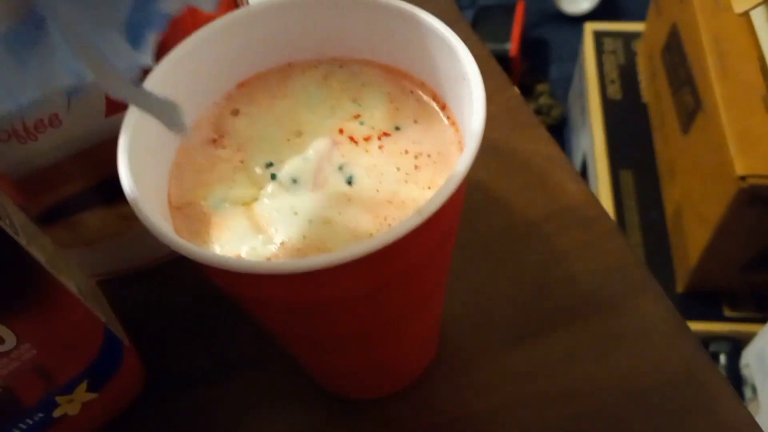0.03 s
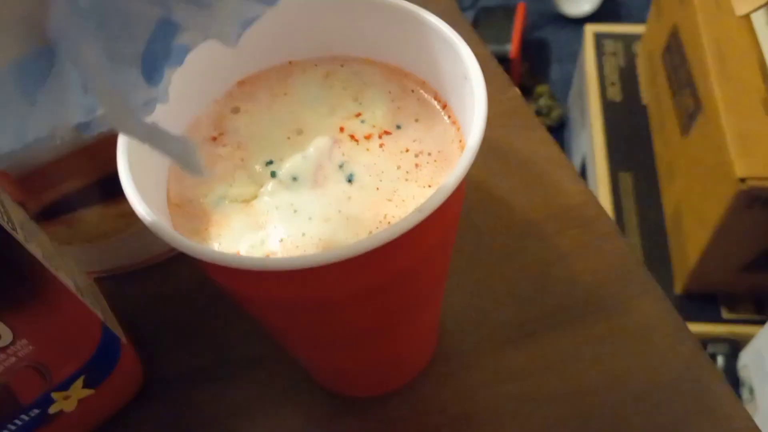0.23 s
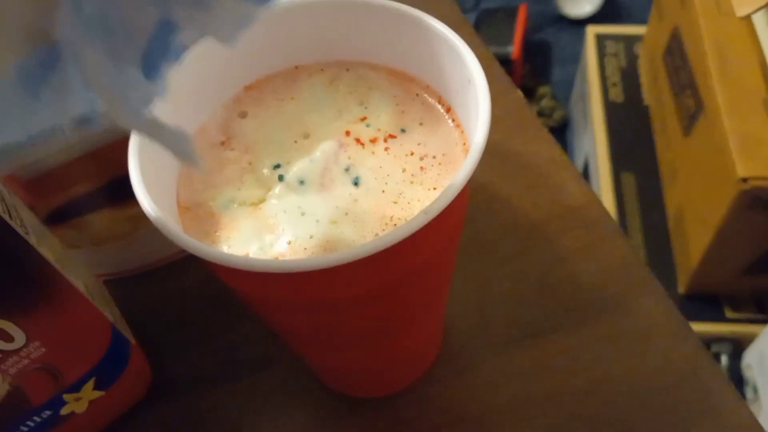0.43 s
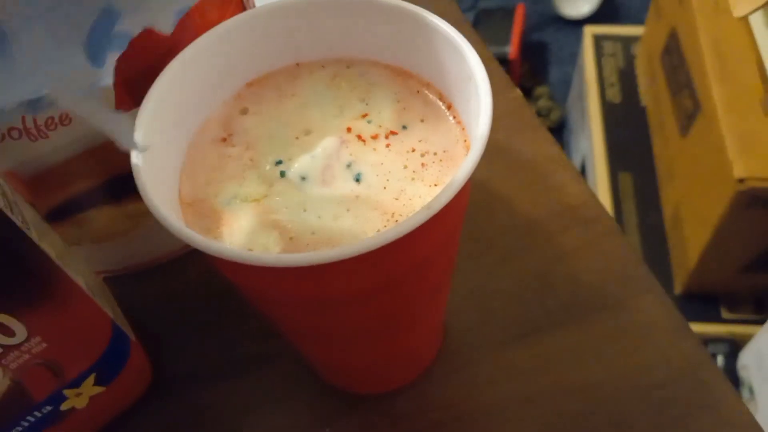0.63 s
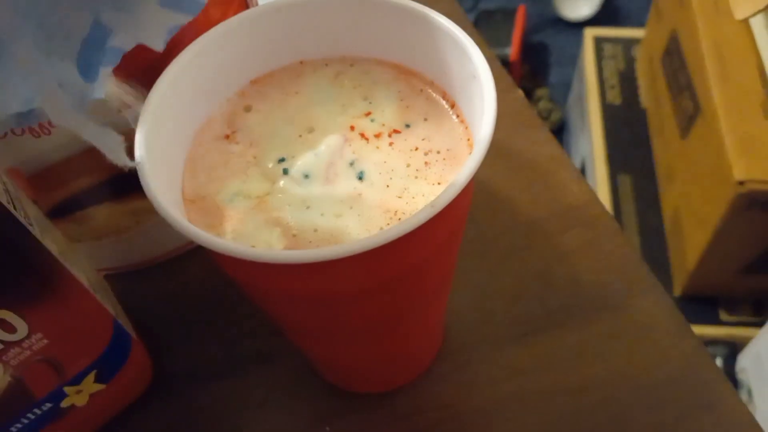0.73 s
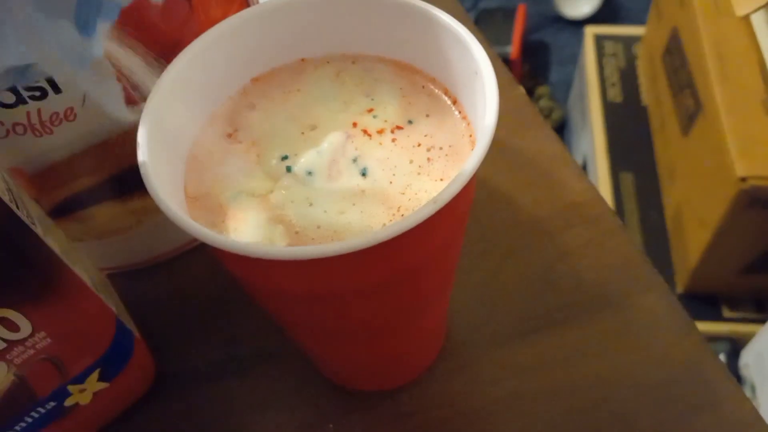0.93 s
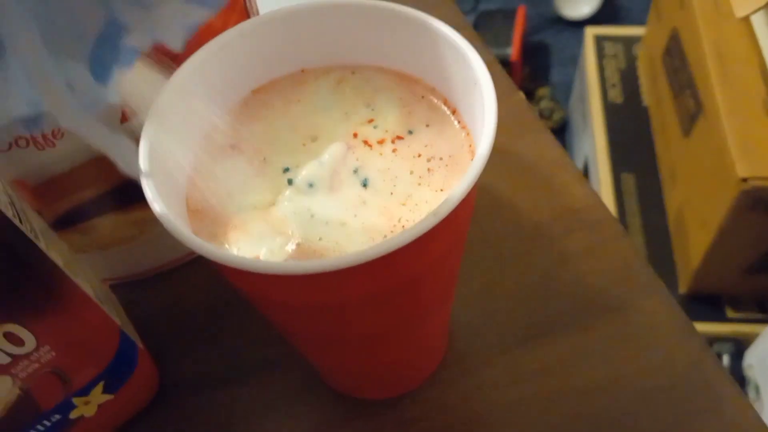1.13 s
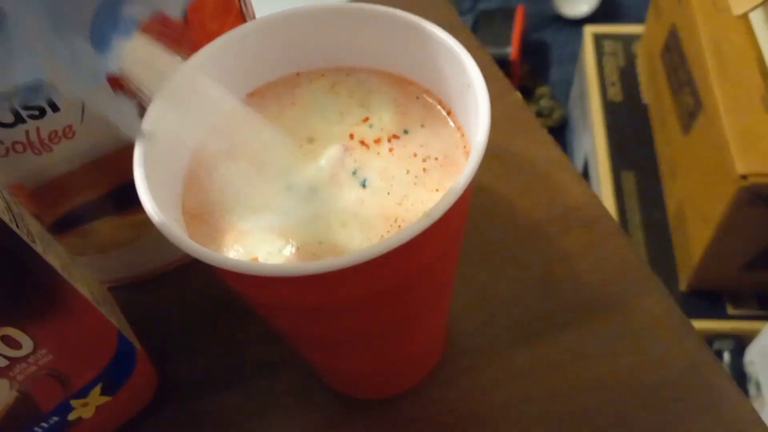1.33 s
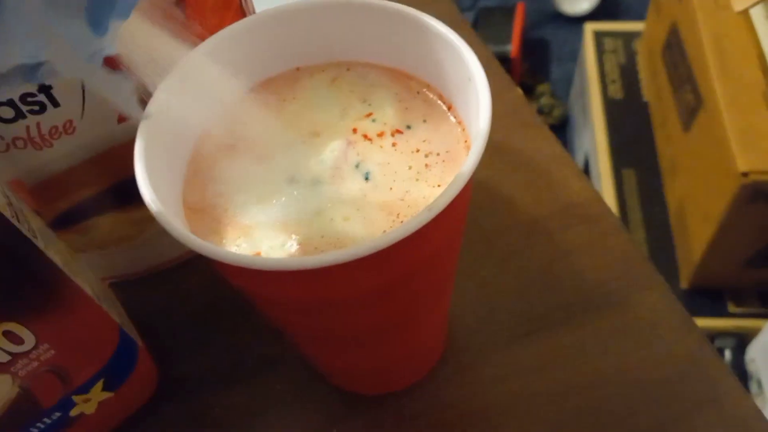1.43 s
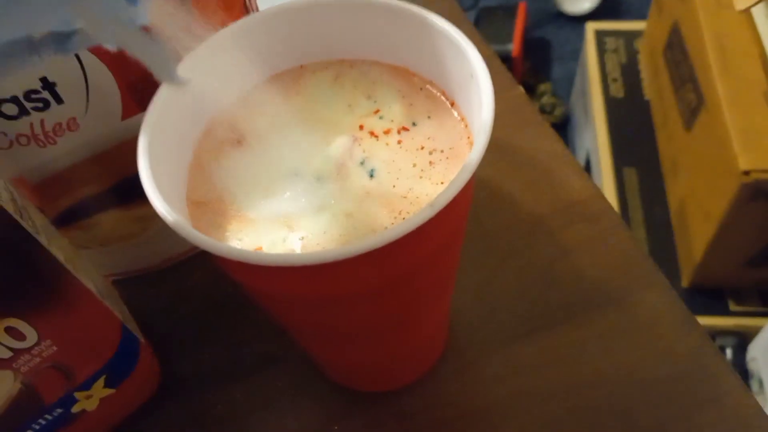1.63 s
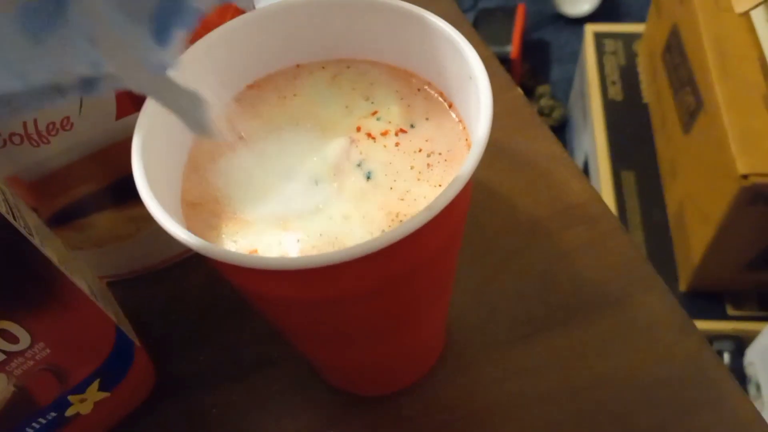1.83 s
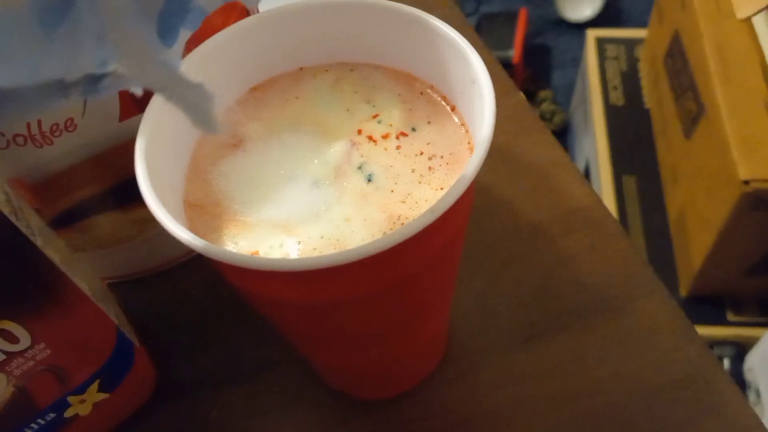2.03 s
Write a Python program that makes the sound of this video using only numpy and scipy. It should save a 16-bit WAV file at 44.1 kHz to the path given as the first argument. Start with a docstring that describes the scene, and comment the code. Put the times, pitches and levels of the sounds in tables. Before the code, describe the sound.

A grainy hiss of sugar pouring into a cup, with bag rustling and one sharp paper crunch

```python
"""A quiet room, with a paper bag and a cup on the left, close to a spaced pair of microphones.
From the start the room's noise rumbles under a faint trickle of granulated sugar (random tiny impacts).
From 0.15 s the bag rustles as it tips and starts to tick (noise and decaying rings); the sugar swells by 0.35 s.
Near 0.66 s the paper crunches once (creases and sharp folds ring its resonances), and ticks go on now and then.
After 1.4 s the sugar thins out. Three soft low bumps lie below, at 0.27, 0.68 and 1.42 s."""
import sys
import numpy as np
from scipy import signal
from scipy.fft import rfft, irfft, next_fast_len
from scipy.io import wavfile
from scipy.ndimage import uniform_filter1d, map_coordinates

SR = 44100
rng = np.random.default_rng(int(sys.argv[2]) if len(sys.argv) > 2 else 0)


def materialize(psi):
    """Save the field psi as 16-bit PCM at rate SR to the path in sys.argv[1].

    A 1-D psi becomes a single channel; in a 2-D psi each row is a channel.
    """
    bounded = np.clip(np.atleast_2d(psi).T, -1, 1)
    quanta = np.round(bounded * 32767).astype(np.int16)
    wavfile.write(sys.argv[1], SR, quanta)


N = 92610  # samples: 2.1 s


def amp(db):
    """Decibels to an amplitude factor."""
    return 10 ** (np.asarray(db) / 20)


def unit(x):
    """x scaled to an rms of one."""
    return x / np.sqrt(np.mean(x ** 2) + 1e-20)


def along(points, hz):
    """A curve through (frequency, value) points on a log frequency axis."""
    f, v = np.transpose(points)
    return np.interp(np.log(hz + 1), np.log(f + 1), v)


def curves(rows):
    """Each column as a curve over time, one value per sample; -120 outside the rows."""
    times, *columns = np.transpose(rows)
    return [np.interp(np.arange(N) / SR, times, c, left=-120, right=-120) for c in columns]


def wobble(rate):
    """A smooth random curve with `rate` knots a second."""
    knots = rng.standard_normal(int(N * rate / SR) + 4)
    return map_coordinates(knots, [np.arange(N) * rate / SR])


def filtered(x, response):
    """x filtered by a (complex) response of frequency, padded so that the end does not wrap."""
    m = next_fast_len(N + SR // 2)
    return irfft(rfft(x, m) * response(np.fft.rfftfreq(m, 1 / SR)), m)[..., :N]


def ringing(peaks):
    """The response of causal resonances side by side, with alternating signs."""
    def response(f):
        total = 0
        for k, (centre, width, db) in enumerate(peaks):
            damping = 1j * f * width
            total = total + (-1) ** k * amp(db) * damping / (centre * centre - f * f + damping)
        return total
    return response


def grains(per_s, scatter_db):
    """Two independent trains of random tiny impacts of uneven size, either sign."""
    chance, size = rng.random((2, N)), rng.standard_normal((2, N))
    sign = rng.choice([-1, 1], (2, N))
    return (chance < per_s / SR) * sign * amp(scatter_db * size)


ROOM_DB = -65  # mean level of the rumble
# spectrum of the room's rumble: (frequency [Hz], relative density [dB per Hz])
ROOM_COLOUR = [(33, -48), (52, -2), (88, 3), (130, -6), (200, -14.5), (350, -13.5), (550, -27.5),
               (2000, -30.5)]


def room():
    """A low, gently wavering noise, unrelated at the two microphones, and the soft bumps."""
    noise = filtered(rng.standard_normal((2, N)), lambda f: amp(along(ROOM_COLOUR, f)))
    soft = bumps()
    return amp(ROOM_DB + 0.46 * wobble(9.0)) * unit(noise) + soft


# the sugar over time: (time [s], fine hiss [relative dB], coarser rush [relative dB], low rush [relative dB])
SUGAR_FLOW = [(0, -51, -50, -51.5), (.04, -51, -55.5, -68), (.15, -50.5, -52.5, -62), (.28, -42, -56, -66),
              (.35, -36, -50.5, -69), (.42, -40.5, -48, -65), (.62, -38.5, -45, -62),
              (.78, -38, -45.5, -54), (.82, -40.5, -43.5, -55.5), (.95, -39, -43, -58.5),
              (1.0, -36, -41, -56.5), (1.1, -37, -43, -56), (1.27, -39.5, -44, -65),
              (1.44, -42, -47, -60.5), (1.52, -47.5, -51, -71.5), (1.7, -55, -57.5, -104),
              (1.82, -58.5, -54, -65), (1.95, -58, -69.5, -78), (2.1, -62, -90, -105)]
# spectra of the three layers: (frequency [Hz], relative density [dB per Hz])
FINE_COLOUR = [(2500, -23.5), (3400, 3.5), (4200, 0.5), (5200, 5.5), (7000, 2.5), (7700, 7), (9800, -1.5),
               (11200, 4), (13500, 4.5), (15800, 5)]
COARSE_COLOUR = [(1000, -21), (1500, -7.5), (1800, 0), (2400, -2), (3400, 3.5), (4200, -0.5), (6000, -3)]
LOW_COLOUR = [(350, -11.5), (550, -13), (1000, 0), (1400, -1.5), (2000, -13)]
FINE_PER_S, COARSE_PER_S, GRAIN_DB = 14000, 4000, 1  # grains a second (two rates), scatter of their size


def sugar_layer(per_s, colour):
    """Grain impacts given one spectrum, at an rms of one."""
    return unit(filtered(grains(per_s, GRAIN_DB), lambda f: amp(along(colour, f))))


def sugar():
    """Countless crystals sliding and landing: a fine hiss over a coarser and a low rush."""
    fine_db, coarse_db, low_db = curves(SUGAR_FLOW)
    fine = sugar_layer(FINE_PER_S, FINE_COLOUR)
    coarse = sugar_layer(COARSE_PER_S, COARSE_COLOUR)
    low = sugar_layer(COARSE_PER_S, LOW_COLOUR)
    # hiss and coarser rush waver independently
    fine = fine * amp(fine_db + 0.8 * wobble(16) + 0.6 * wobble(8))
    coarse = coarse * amp(coarse_db + 1.85 * wobble(13.97))
    return fine + coarse + low * amp(low_db)


CREASE_DB = 3  # scatter of the size of the creases


def creases(level_db, per_s, peaks):
    """Small creases of paper, following a level curve, excite a set of resonances."""
    shape = ringing(peaks)
    impacts = grains(per_s, CREASE_DB)
    return filtered(impacts * amp(level_db), shape) / np.std(filtered(impacts, shape))


# resonances of the air in the bag: (centre [Hz], width [Hz], level [dB])
BAG_AIR = [(200, 72, -3.5), (315, 49, 8.5), (399, 70, 3), (565, 165, 2)]
BOOM_PER_S = 11000  # impacts a second


def flexing(rows, per_s, peaks):
    """The paper creases, and the air inside the bag booms along."""
    level_db, boom_db = curves(rows)
    return creases(level_db, per_s, peaks) + creases(level_db + boom_db, BOOM_PER_S, BAG_AIR)


# the bag as it tips: (time [s], relative level [dB], boom over it [dB])
RUSTLE_FLOW = [(.15, -64, -3), (.2, -53.5, -9), (.24, -51, 1.5), (.28, -46, -16), (.312, -39, 0),
               (.35, -40, -9.5), (.43, -45, -11.5), (.48, -41.5, -13), (.515, -43, -5.5), (.545, -52, 0.5),
               (.57, -47.5, -20), (.62, -58, -2)]
# resonances of the rustling paper: (centre [Hz], width [Hz], level [dB])
PAPER_RESONANCES = [(690, 340, -2), (1085, 280, 1), (1760, 320, 1.5), (2620, 530, -1), (4450, 2200, -6)]


def rustle():
    """The tipping bag's creases, 2000 a second, ring the loose paper."""
    return flexing(RUSTLE_FLOW, 2000, PAPER_RESONANCES)


HIGH_SHARE, RISE_SHARE = .55, 0.14  # high decay over low decay, rise time constant over decay
SECOND_HIGH, SECOND_HIGH_DB = 1.2, -6  # a second high ring: frequency ratio, level
SECOND_LOW, SECOND_LOW_DB = 1.42, -7  # a second low ring: frequency ratio, level
SNAP_DB = -5  # a short noisy snap
ECHO_T60_S, ECHO_GAP_S, ECHO_DB = .3, 0.0016, -6  # the table's answer: decay, delay, level


def ring(hz, t60, t):
    """A tone that swells fast and dies away by 60 dB in t60 seconds."""
    decay = amp(-60 * (t / t60) ** 1.157)
    rise = 1 - np.exp(-t / (RISE_SHARE * t60))
    return decay * rise * np.sin(2 * np.pi * hz * t)


# ticks of the bag:
# (time [s], relative level [dB], low ring [Hz], high ring [Hz], high over low [dB], low t60 [s])
BAG_TICKS = [(.228, -36, 706, 1660, -9, 0.036), (0.256, -38.5, 664, 1750, -27, 0.011),
             (.277, -42, 692, 1750, -8, 0.047), (.303, -38.5, 750, 1850, -1, 0.043),
             (.344, -39.5, 615, 1798, 3, 0.039), (0.504, -33.5, 410, 1725, 1.5, 0.026),
             (.604, -37.5, 856, 2400, -20, 0.012), (0.712, -44.5, 1030, 1580, 11, .015),
             (.973, -41, 1014, 1720, 8, 0.02), (1.0433, -36, 790, 1750, 1.5, 0.011),
             (1.4222, -39, 747, 1956, 7.5, 0.018), (1.749, -50, 2160, 4460, 4.5, 0.0063),
             (1.796, -51, 900, 2260, 9, 0.0095), (1.9228, -43.5, 587, 1320, -15, 0.019),
             (2.0285, -69, 790, 1830, 9.5, 0.018)]


def ticks():
    """Each tick snaps and rings low and high; the table answers with a decaying noise tail."""
    out, t = np.zeros((2, N + SR)), np.arange(SR // 5) / SR
    for s, db, low_hz, high_hz, high_db, t60 in BAG_TICKS:
        high_t60 = HIGH_SHARE * t60
        high = ring(high_hz, high_t60, t)
        high = high + amp(SECOND_HIGH_DB) * ring(SECOND_HIGH * high_hz, high_t60, t)
        low = ring(low_hz, t60, t) + amp(SECOND_LOW_DB) * ring(SECOND_LOW * low_hz, t60, t)
        # the snap is smoothed noise on a ring midway between the two pitches
        mid_hz = np.sqrt(low_hz * high_hz)
        noise = uniform_filter1d(rng.standard_normal(len(t)), size=round(2 * SR / mid_hz))
        snap = unit(noise) * ring(mid_hz, t60 / 2, t)
        hit = 2 * (low - amp(high_db) * high + amp(SNAP_DB + max(high_db, 0)) * snap)
        tail = rng.standard_normal((2, len(t))) * amp(-60 * t / ECHO_T60_S) * (t > ECHO_GAP_S)
        tail = tail / np.linalg.norm(tail[0])
        echo = signal.fftconvolve(hit[None], tail, axes=1)[:, :len(t)]
        start = round(s * SR)
        out[:, start:start + len(t)] += amp(db) * (hit + amp(ECHO_DB) * echo)
    return out[:, :N]


THUMP_S, THUMP_HZ = 0.015, 81.2  # time from onset to fullest swell, pitch
# soft low bumps: (onset time [s], peak level [dB])
SOFT_BUMPS = [(0.267, -51), (0.684, -53.5), (1.422, -56)]


def bumps():
    """Soft swells of one low tone, in a random phase at each microphone."""
    t, out = np.arange(N) / SR, np.zeros((2, N))
    for s, db in SOFT_BUMPS:
        phase = rng.uniform(0, 2 * np.pi, (2, 1))
        u = np.clip(t - s, 0, 1) / THUMP_S
        out += amp(db) * u * np.exp(1 - u) * np.sin(2 * np.pi * THUMP_HZ * t + phase)
    return out


# the crunch: (time [s], relative level [dB], boom over it [dB])
CRUNCH_FLOW = [(.64, -48, -42), (.66, -39, -14), (.664, -29, -22), (.670, -34, -20), (.683, -29, -19),
               (.692, -40, -10), (.715, -45, -14), (.76, -60, -6)]
# resonances of the crunching paper: (centre [Hz], width [Hz], level [dB])
FOLD_RESONANCES = [(800, 670, -6.5), (1450, 150, 4), (1790, 120, -2), (2150, 320, -5), (3280, 200, 2),
                   (3690, 200, 1), (4200, 640, -6.5), (7260, 3300, -9)]


def crunch():
    """One burst of creases, 3000 a second, rings the folded paper."""
    return flexing(CRUNCH_FLOW, 3000, FOLD_RESONANCES)


# sharp folds in the crunch: (time [s], level of the blow before it rings the paper [relative dB])
SHARP_FOLDS = [(0.658, -15), (0.6623, -7), (.6645, -8), (0.6665, -8), (.6735, -9), (.6815, -6), (.684, -12)]


def sharp_folds():
    """Single 8-sample blows of random sign ring the crunch resonances."""
    blows = np.zeros((2, N))
    for s, db in SHARP_FOLDS:
        start = round(s * SR)
        blows[:, start:start + 8] = amp(db) * rng.choice([-1, 1], (2, 1)) * np.hanning(8)
    return filtered(blows, ringing(FOLD_RESONANCES))


# level in the right channel: (frequency [Hz], right over left [dB])
RIGHT_LEVEL = [(150, -8), (850, -6.5), (1300, -4.5), (2500, -7), (5000, -7.5), (7500, -2), (8600, -9),
               (10500, -2.5), (13000, -6), (15500, -8.5)]
# likeness of the late part for a wide source: (frequency [Hz], share that reaches the right late [0-1])
LATE_SHARE = [(300, 0.99), (2000, 0.63), (3000, 0.54), (6000, 0.2), (7200, 0.028)]
# treble common to both channels: (frequency [Hz], share that is the same in left and right, without lag [0-1])
COMMON_SHARE = [(6500, 0.043), (7700, 0.3), (8600, 0.72), (10500, 0.68), (15500, 0.64)]


def heard(pair, spread, lag_s):
    """Nearer the left microphone; the right channel is weaker: part late, part common, part unrelated."""
    def common(f):
        return np.clip(along(COMMON_SHARE, f), 0, 1)

    def alike(f):
        # spread 0 is a point source, 1 the full width
        late = 1 - spread * (1 - np.clip(along(LATE_SHARE, f), 0, 1))
        return (1 - common(f)) * late * np.exp(-2j * np.pi * f * lag_s) + common(f)

    def to_right(f):
        # the second draw fills up the power that the first leaves
        rest = np.sqrt(np.clip(1 - abs(alike(f)) ** 2, 0, 1))
        return amp(along(RIGHT_LEVEL, f)) * [alike(f), rest]

    return np.array([pair[0], filtered(pair, to_right).sum(0)])


STREAM_LAG_S, BAG_LAG_S = 0.000396, 0.00047  # lateness of the late part at the right microphone
NOTCH_HZ, NOTCH_WIDTH_HZ, NOTCH_DEPTH = 3000, 260, .75  # a narrow gap; depth is the share removed


def scene():
    """Sugar and bag close by on the left, with a gap near 3 kHz, over the room."""
    bag = heard(rustle() + crunch() + sharp_folds(), 1, BAG_LAG_S) + heard(ticks(), 0, BAG_LAG_S)
    stream = heard(sugar(), 1, STREAM_LAG_S)
    resonance = ringing([(NOTCH_HZ, NOTCH_WIDTH_HZ, 0)])
    close = filtered(stream + bag, lambda f: 1 - NOTCH_DEPTH * resonance(f))
    return amp(4.5) * close + room()


def record(dry):
    """Behind the microphones, nothing is kept from the band limit of 15750 Hz upwards."""
    return filtered(dry, lambda hz: hz < 15750)


dry = scene()
out = record(dry)
materialize(out)
```